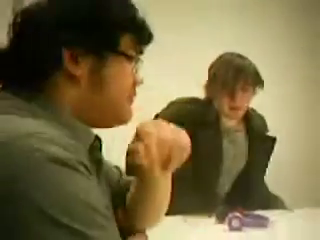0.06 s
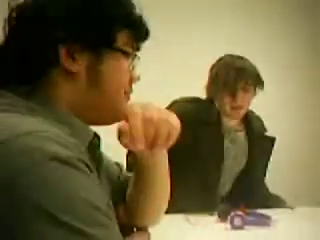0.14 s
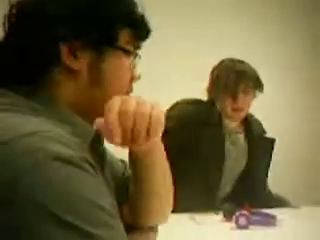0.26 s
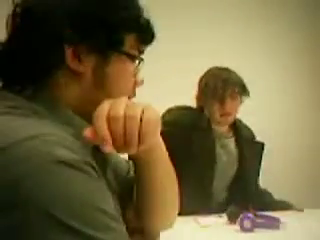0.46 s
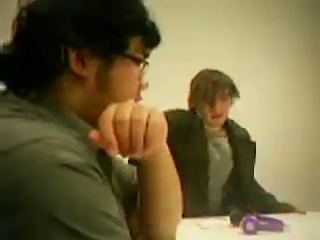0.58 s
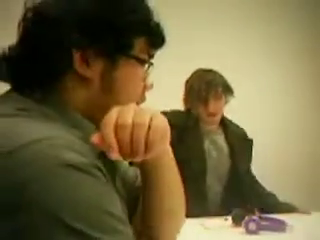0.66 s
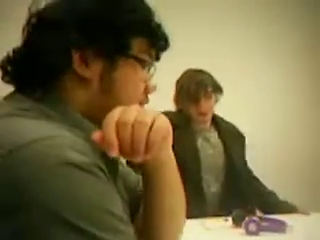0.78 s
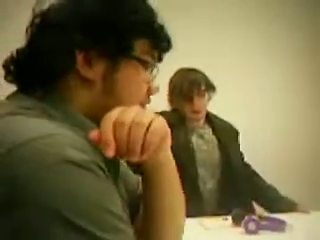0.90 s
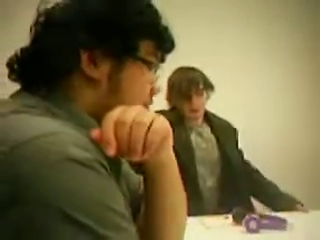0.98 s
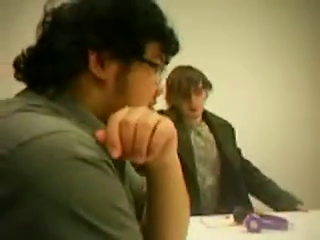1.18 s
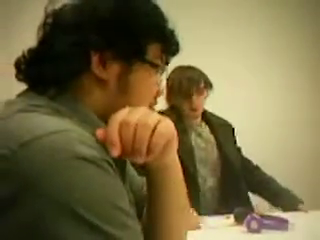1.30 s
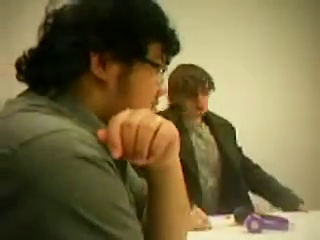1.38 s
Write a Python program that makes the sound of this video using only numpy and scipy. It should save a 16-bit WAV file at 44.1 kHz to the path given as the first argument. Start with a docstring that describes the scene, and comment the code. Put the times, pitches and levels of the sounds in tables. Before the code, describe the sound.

A hard plastic die clatters across a table in a bare, echoing room and settles

```python
"""Die thrown in a bare room

Place: a table in a bare, echoing room. A hard plastic die bounces, tumbles in ever softer clacks and
rocks to rest: clicks excite short clacks, ringing table modes and the room's echo. Later something,
perhaps a sleeve, slides softly: coloured noise with a thin sine squeak. Steady room noise lies below.
Microphone: a small narrow-band recorder that turns its gain down and overloads on the first bounces."""
import sys
import numpy as np
from scipy import signal
from scipy.fft import rfft, irfft
from scipy.io import wavfile

SR = 44100
rng = np.random.default_rng(int(sys.argv[2]) if len(sys.argv) > 2 else 0)


def to_wav(s):
    """Save 16-bit WAV."""
    ch = np.atleast_2d(s).T  # columns
    pcm = np.round(np.clip(ch, -1, 1) * 32767)  # PCM
    wavfile.write(sys.argv[1], SR, pcm.astype(np.int16))


N = 63945
T = np.arange(N) / SR  # time in seconds


def from_db(db):
    """Decibels to gain."""
    return 10 ** (np.asarray(db) / 20)


def rms_one(x):
    """Scale to unit rms."""
    return x / np.sqrt(np.mean(x ** 2) + 1e-20)


def at_hz(points, hz, axis=1):
    """Read a column of a table on a log-frequency axis."""
    table = np.array(points)
    return np.interp(np.log(np.maximum(hz, 1)), np.log(table[:, 0]), table[:, axis])


def lag(x, seconds):
    """One-pole smoothing."""
    r = np.exp(-1 / (seconds * SR))
    return signal.lfilter([1 - r], [1, -r], x)


def decay(t60):
    """Exponential fade by 60 dB in t60 seconds, scaled to unit rms."""
    return rms_one(np.exp(-np.log(1000) * T / t60))


def colour(x, spectrum):
    """Causal (minimum-phase) filter that follows a spectrum, built by folding its cepstrum."""
    hz = np.arange(N + 1) * SR / (2 * N)
    cepstrum = irfft(np.log(from_db(at_hz(spectrum, hz))))
    cepstrum[1:N] *= 2
    cepstrum[N + 1:] = 0
    response = np.exp(rfft(cepstrum))
    return irfft(rfft(x, 2 * N) * response)[:N]


def noise(spectrum):
    """Coloured noise, scaled to unit deviation within the recorder's band."""
    x = colour(rng.standard_normal(N), spectrum)
    return x / np.std(narrow_band(x))


def click(s, db):
    """One impulse."""
    return from_db(db) * (np.arange(N) == int(s * SR))


def ring(x, hz, t60):
    """Two-pole resonator: a unit click sets a decaying cosine of height 1 ringing."""
    r = from_db(-60 / (t60 * SR))
    w = 2 * np.pi * hz / SR
    tiny = 1e-18  # keeps the filter state away from zero
    return signal.lfilter([1, -r * np.cos(w)], [1, -2 * r * np.cos(w), r * r], x + tiny)


# The die meets the table. Each row: time in seconds, relative strength in dB, pitch of the clack in Hz,
# relative strength of the sharp tick in dB.
DIE_CONTACTS = [(.2460, -5.5, 2900, 6), (0.2483, 1, 1887, -1.5), (0.2646, -13, 3343, -1),
                (.2890, -3, 2500, 4), (0.2904, 0.5, 1580, -6.5), (0.3632, 0, 2670, 0),
                (0.3704, -3, 1610, -5), (0.4501, -7.5, 1580, -3.5), (0.4515, -3, 1565, -5),
                (.4560, 0.5, 2437, -4), (0.5224, -7, 1500, 2), (0.525, -7, 1423, -12),
                (0.5828, -11, 2464, 2), (0.585, -6.5, 1594, -7), (.6180, -22.5, 1706, 9),
                (.6480, -12.5, 2675, -1), (0.6489, -8, 1556, -5.5), (0.6633, -12.5, 3230, -9),
                (0.6873, -11.5, 1460, 1), (0.7366, -18.5, 3000, 2), (0.7386, -11, 1500, -6.5),
                (.7610, -18.5, 1670, 6.5), (.7740, -25, 1594, 6.5), (.8030, -20.5, 1790, 6.5),
                (0.818, -15, 2380, -8.5)]
THUD_HZ, THUD_DB, THUD_T60_S = 129, -19, .08


def die(spots=6):
    """The die travels, so successive contacts reach the room from different spots; the first landing thuds."""
    contacts = list(DIE_CONTACTS) + rocking()
    thud = ring(click(DIE_CONTACTS[0][0], THUD_DB), THUD_HZ, THUD_T60_S)
    return sum(knocks(contacts[k::spots]) for k in range(spots)) + table_top() + thud


ROCK_START_S, ROCK_END_S = .84, .912  # nominal times of the first and last tap
ROCK_DB, ROCK_FADE_DB_PER_S, ROCK_HZ = -25.5, 11.5, 1500


def rocking(count=6):
    """Small uneven taps that fade as the die settles on a face, as rows like the contacts."""
    slip, vary_db = rng.standard_normal((2, count))
    steps = (np.arange(count) + 0.17 * slip) / (count - 1)
    times = ROCK_START_S + (ROCK_END_S - ROCK_START_S) * steps
    levels = ROCK_DB - ROCK_FADE_DB_PER_S * (times - ROCK_START_S) + vary_db
    return [(s, db, ROCK_HZ, 0) for s, db in zip(times, levels)]


# Colour of the sharp tick. Each row: frequency in Hz, relative level in dB.
TICK_COLOUR = [(30, -14), (120, -10), (300, -2.5), (600, 3), (1000, 3), (1700, 6), (2600, -1), (3600, -1),
               (4500, 0)]
TICK_DB, CLACK_T60_S = 16.5, 0.0076
CLACK_TO_ROOM_DB = -7  # clacks feed the room more weakly than they reach the microphone directly


def knocks(contacts):
    """Contacts at one spot: each gives a sharp tick and a short ringing clack, echoed by the room."""
    ticks = sum(click(s, db + tick_db) for s, db, _, tick_db in contacts)
    ticks = from_db(TICK_DB) * colour(ticks, TICK_COLOUR)
    clacks = sum(ring(click(s, db), hz, CLACK_T60_S) for s, db, hz, _ in contacts)
    echoes = room(ticks + from_db(CLACK_TO_ROOM_DB) * clacks)
    return disperse(ticks + clacks + echoes)


# Bending waves spread each knock, treble first. Each row: centre in Hz, width in Hz.
BENDING_SPREAD = [(900, 1600), (1400, 1100), (1900, 1200), (2700, 1940)]


def disperse(x):
    """All-pass stages: the table top smears a click over a few milliseconds."""
    for hz, width_hz in BENDING_SPREAD:
        r = np.exp(-np.pi * width_hz / SR)
        poles = [1, -2 * r * np.cos(2 * np.pi * hz / SR), r * r]
        x = signal.lfilter(poles[::-1], poles, x)
    return x


# The table top rings. Each row: mode in Hz, mean level in dB, time to fall 60 dB in seconds.
TABLE_MODES = [(481, -42, .6), (578, -38, .55), (636, -41, 0.78), (1087, -37, 0.5), (1297, -36, .4),
               (1462, -37, 0.13), (1532, -37, 0.56), (1670, -37, 0.2), (1850, -36.5, 0.18),
               (1858, -36, .35), (2030, -39.5, 0.28), (2310, -55.5, .25), (2490, -29.5, .3),
               (2867, -40, .25)]
MODE_VARY_DB = 4.5  # spread of mode strength from contact to contact


def table_top():
    """Decaying modes: every contact in the table of contacts strikes each with a strength of its own."""
    s, db = np.transpose(DIE_CONTACTS)[:2]
    out = 0
    for hz, mode_db, t60 in TABLE_MODES:
        blows = np.zeros(N)
        strike_db = db + mode_db + MODE_VARY_DB * rng.standard_normal(len(s))
        blows[(s * SR).astype(int)] = from_db(strike_db)
        out = out + ring(blows, hz, t60)
    return out


# First reflections, by extra paths of roughly 3 to 8 m. Each row: mean delay in seconds, level in dB.
FIRST_REFLECTIONS = [(.0078, -29), (0.0113, -13.5), (0.0221, -11.5)]
ECHO_VARY = 0.11  # delays differ from spot to spot by up to this share
# The room's echo. Each row: frequency in Hz, relative level in dB, time to fall 60 dB in seconds.
ROOM_ECHO = [(60, 0, .9), (256, 2, .9), (600, 2, 0.51), (1150, -0.5, 0.47), (2050, 2.5, 0.47), (3170, 3, 1),
             (4000, 2, 0.24)]
TAIL_DB = .5  # relative to the early scatter
EARLY_T60_S, ROOM_BUILD_S = .115, .003


def room(x):
    """A few distinct reflections, a quick scatter from things nearby and a tail that dies band by band."""
    edges = np.geomspace(30, 6000, 15)
    white, response = rng.standard_normal((2, N)), 0
    early = decay(EARLY_T60_S)
    for k, (low, high) in enumerate(zip(edges, edges[1:])):
        # neighbouring bands draw on different noise
        band = signal.sosfilt(signal.butter(2, [low, high], "band", fs=SR, output="sos"), white[k % 2])
        hz = np.sqrt(low * high)
        tail = from_db(TAIL_DB) * decay(at_hz(ROOM_ECHO, hz, axis=2))
        envelope = np.hypot(tail, early) / np.sqrt(N)
        response = response + band * from_db(at_hz(ROOM_ECHO, hz)) * envelope
    response = response * (1 - np.exp(-T / ROOM_BUILD_S))
    for s, db in FIRST_REFLECTIONS:
        response = response + click(s * (1 + ECHO_VARY * rng.uniform(-1, 1)), db)
    return signal.fftconvolve(x, response)[:N]


# Colour of the soft slide. Each row: frequency in Hz, relative level in dB per Hz.
SLIDE_COLOUR = [(60, -3), (200, -7), (480, 5), (900, 1.5), (1400, 3), (1950, 3.5), (2750, -4.5),
                (3400, -0.5), (4000, -3)]
SLIDE_START_S, SLIDE_ATTACK_S, SLIDE_DB = 1.26, 0.011, -35
SQUEAK_HZ, SQUEAK_WAVER_HZ, SQUEAK_WAVER_S = 3158, 22, 0.0054  # centre, rms waver, its smoothing
SQUEAK_DB, SQUEAK_ATTACK_S = -43, 0.076


def slide():
    """Soft friction hiss from coloured noise; a thin wavering sine squeak grows out of it."""
    age = np.maximum(T - SLIDE_START_S, 0)
    hiss = from_db(SLIDE_DB) * noise(SLIDE_COLOUR) * (1 - np.exp(-age / SLIDE_ATTACK_S))
    waver = rms_one(lag(rng.standard_normal(N), SQUEAK_WAVER_S))
    hz = SQUEAK_HZ + SQUEAK_WAVER_HZ * waver
    squeak = from_db(SQUEAK_DB) * rms_one(np.sin(2 * np.pi * np.cumsum(hz) / SR))
    return hiss + squeak * np.minimum(age / SQUEAK_ATTACK_S, 1)


# Colour of the steady room noise. Each row: frequency in Hz, relative level in dB per Hz.
AIR_COLOUR = [(30, -13), (70, -4), (160, -1.5), (280, -2.5), (430, -1.5), (660, -4), (900, -6.5),
              (1800, -9), (3000, -11), (4000, -11.5)]
AIR_DB = -39.5


def room_noise():
    """Steady background: noise with a fixed colour."""
    return from_db(AIR_DB) * noise(AIR_COLOUR)


def scene():
    """The die in its room, the slide and the steady room noise."""
    return (die() + slide() + room_noise())[None]


BAND_EDGE_HZ, WALL_HZ, CUTOFF_HZ = 3916, 4300, 16000


def narrow_band(x):
    """The recorder's upper band edge: a shoulder, then a wall."""
    hz = np.arange(N + 1) * SR / (2 * N)
    loss = np.sqrt(1 + (hz / BAND_EDGE_HZ) ** 48 + (hz / WALL_HZ) ** 150)
    return irfft(rfft(x, 2 * N) / loss)[:N]


GAIN_THRESHOLD_DB, GAIN_SLOPE = -10, 0.24  # slope: dB of cut per dB over the threshold
GAIN_ATTACK_S, GAIN_RELEASE_DB_PER_S = 0.009, 1  # release: fall of the held overshoot, before the slope
BIAS_SHARE, BIAS_LAG_S, CLIP_LEVEL = 0.31, 0.0098, .72


def record(dry):
    """Narrow band, gain control with slow recovery, a zero line that sags under load, hard overload, top cut."""
    x = narrow_band(dry[0])
    over_db = np.maximum(20 * np.log10(np.abs(x) + 1e-9) - GAIN_THRESHOLD_DB, 0)
    # a peak hold that falls steadily
    release_db = GAIN_RELEASE_DB_PER_S * T
    held_db = np.maximum.accumulate(over_db + release_db) - release_db
    x = x * from_db(-GAIN_SLOPE * lag(held_db, GAIN_ATTACK_S))
    sag = BIAS_SHARE * narrow_band(lag(np.abs(x), BIAS_LAG_S))
    x = np.clip(x - sag, -CLIP_LEVEL, CLIP_LEVEL)
    return signal.sosfilt(signal.cheby2(12, 70, CUTOFF_HZ, fs=SR, output="sos"), x)[None]


dry = scene()
out = record(dry)
to_wav(out)
```